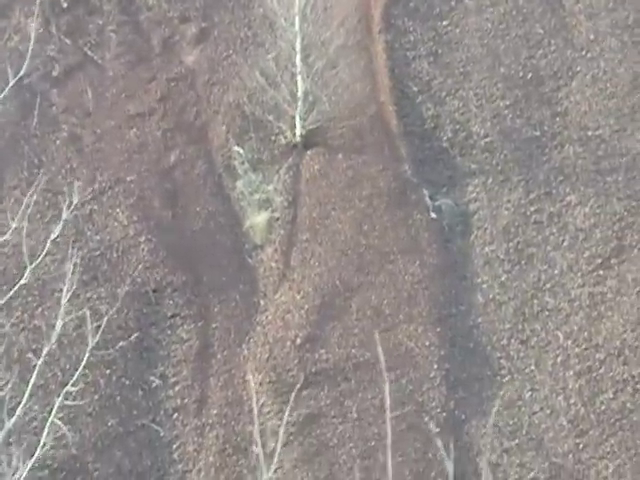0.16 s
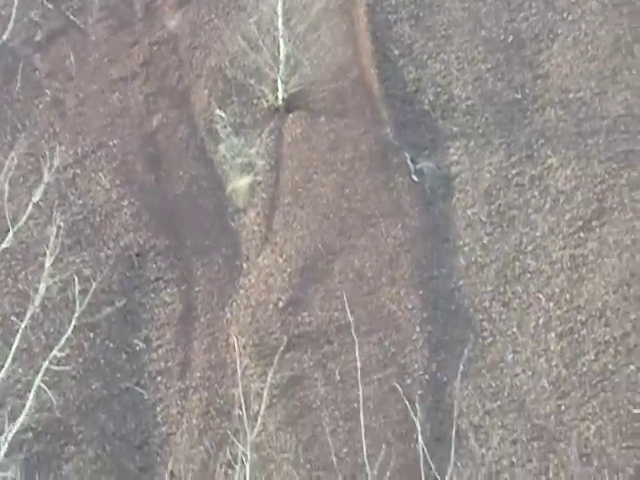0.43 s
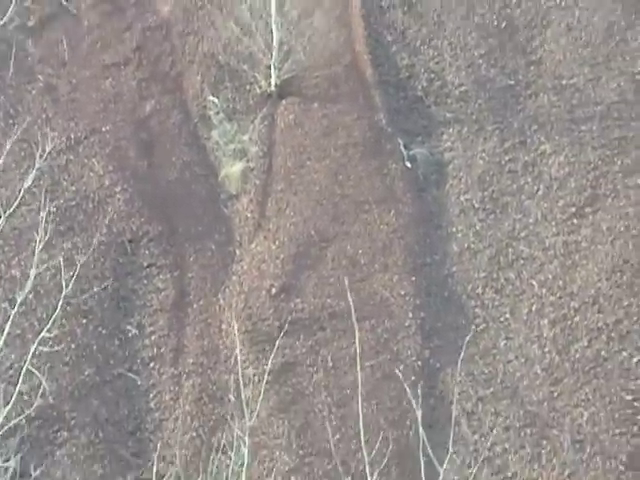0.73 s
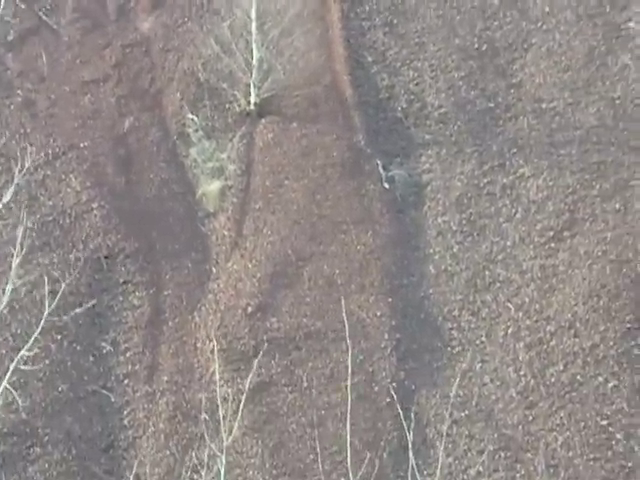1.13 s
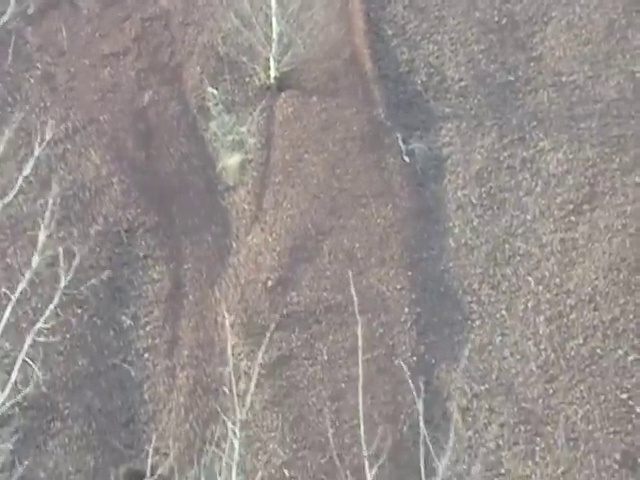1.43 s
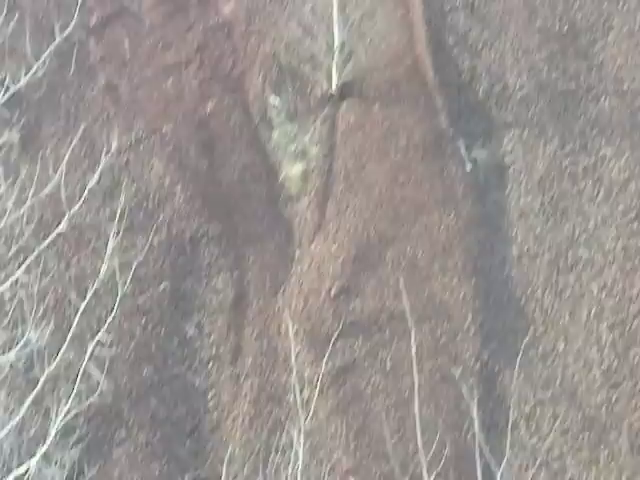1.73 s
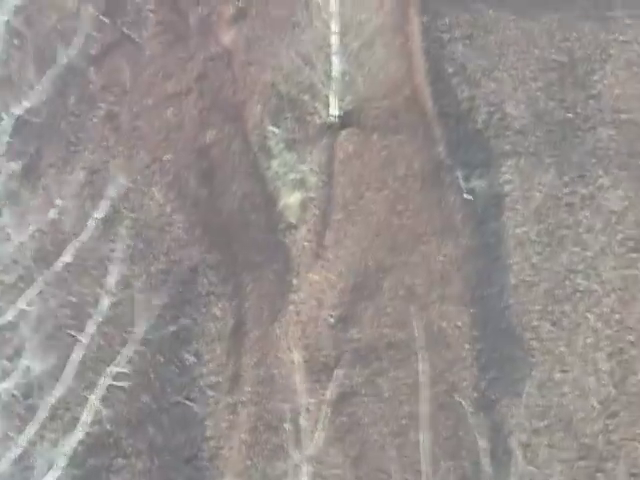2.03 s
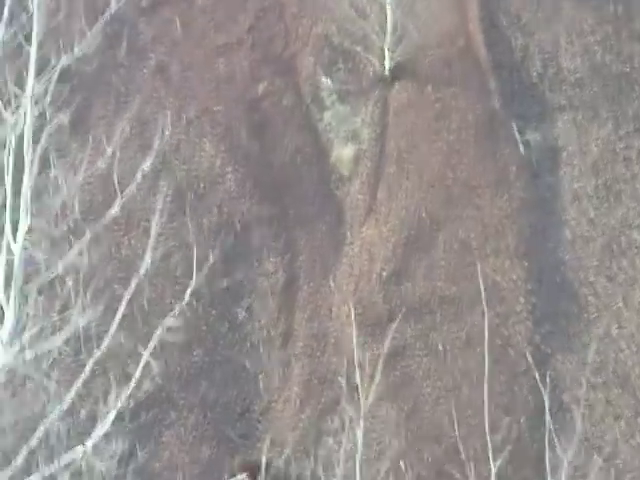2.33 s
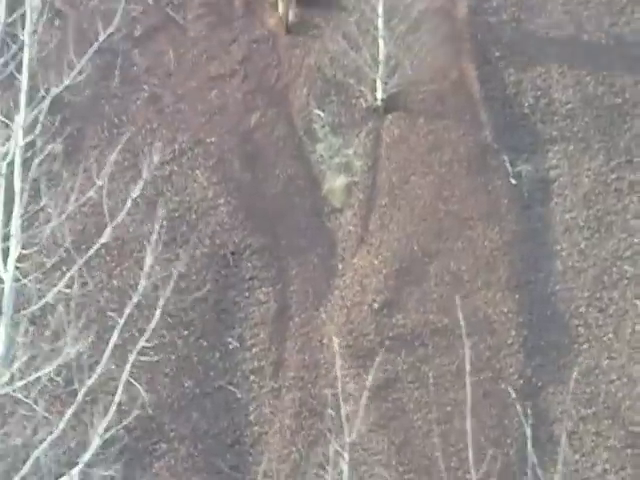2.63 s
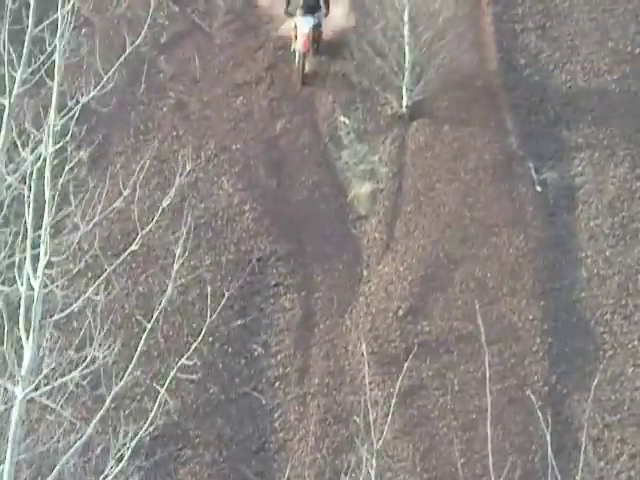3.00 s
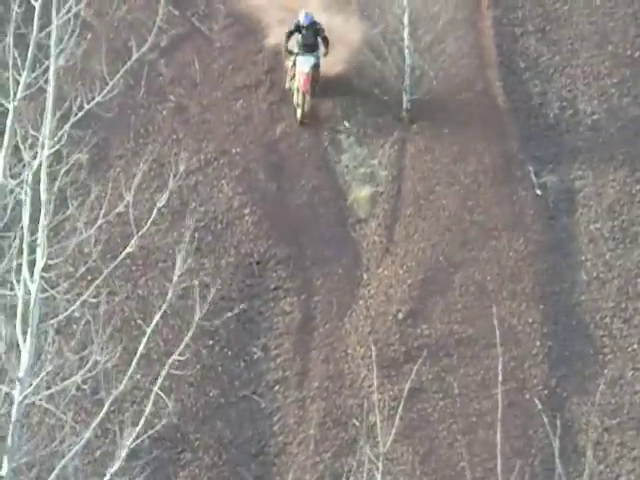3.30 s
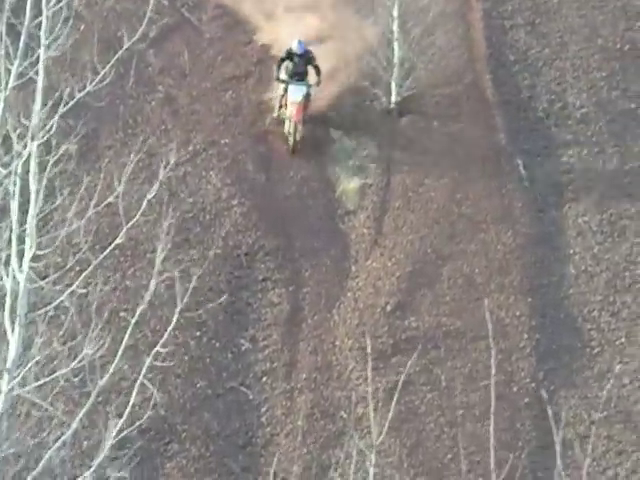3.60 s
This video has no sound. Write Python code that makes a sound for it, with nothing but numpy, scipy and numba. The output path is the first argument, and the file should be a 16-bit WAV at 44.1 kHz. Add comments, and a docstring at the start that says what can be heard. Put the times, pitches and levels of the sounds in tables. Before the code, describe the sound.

A dirt bike putters with dull, irregular pops behind gusty wind thumps, then clears a crest, revs up sharply and drops back to crackling pops; outdoors on a wooded slope, distant narrow-band camera microphone.

```python
"""An uneven putter and popping come down a stony slope through gusty wind, as a dirt bike crosses a crest.
The pops are blurred and dull at first, then sharp; the revs rise briefly and fall, and a thin whine sinks late.
Each pop is a falling snap, silencer rings and a pipe boom, with a gas burst and a scattered noise tail.
Coloured noise makes the wind, the distant rush and the gas rasp; summed sines make the engine's buzz.
A narrow-band camera with a gain control turns everything down on loud blows and recovers slowly."""
import sys
import numpy as np
from scipy import signal
from scipy.fft import rfft, irfft
from scipy.io import wavfile
from scipy.ndimage import uniform_filter1d
from numba import njit

SR = 44100
rng = np.random.default_rng(int(sys.argv[2]) if len(sys.argv) > 2 else 0)


def dump_mix(stems):
    """Bounce the given channels to the path in sys.argv[1] as a 16-bit WAV at rate SR."""
    frames = np.atleast_2d(stems).T  # one column per channel
    limited = np.clip(frames, -1, 1)  # hard clip at full scale
    pcm = np.round(limited * 32767).astype(np.int16)
    wavfile.write(sys.argv[1], SR, pcm)


N = 165375

# Wind blowing on the microphone. Each row: time in seconds, level in dB.
WIND_LEVEL = [(0, -21.5), (.3, -25.5), (.35, -37), (.4, -16.5), (.53, -26.5), (.6, -21.5), (.7, -28),
              (1.0, -29.5), (1.45, -26.5), (1.8, -33), (1.97, -22), (2.15, -27.5), (2.3, -23), (2.72, -50),
              (2.87, -18.5), (3.02, -33.5), (3.3, -28.5), (3.55, -28.5), (3.68, -20.5), (3.75, -26.5)]
# Spectrum of the wind rumble. Each row: frequency in Hz, level in dB.
WIND_COLOUR = [(25, -18.5), (45, -20), (70, -17.5), (130, -2.5), (210, 2.5), (320, 0.5), (550, -5.5),
               (1200, -14.5), (4000, -45.5)]
# Single eddies thumping the diaphragm. Each row: start in seconds, level in dB, swing frequency in Hz.
WIND_THUMPS = [(0.029, -12, 230), (0.063, -2, 450), (0.118, -14, 200), (0.177, -1, 210), (0.26, -0.5, 220),
               (0.292, -8.5, 210), (.388, -5, 380), (.402, 2.5, 400), (.435, -2.5, 430), (.499, 1.5, 190),
               (0.581, -1, 240), (0.594, -12, 260), (0.602, 2, 280), (0.754, -6.5, 240), (0.8126, 4.5, 600),
               (0.8172, 4.5, 400), (.832, 2.5, 330), (0.854, -6.5, 330), (0.963, -9.5, 170),
               (1.001, -2.5, 260), (1.009, -7, 300), (1.039, 0.5, 450), (1.099, -6.5, 170),
               (1.207, -17, 180), (1.221, -1, 210), (1.274, -13, 180), (1.34, -12, 190), (1.388, 0, 230),
               (1.519, -9, 170), (1.584, -10, 280), (1.593, 0.5, 380), (1.725, -6, 170), (1.77, -8, 220),
               (1.82, -10, 230), (1.841, -4.5, 220), (1.964, -8, 190), (2, -26, 200), (2.112, -9, 160),
               (3.153, -3.5, 190)]
# Distant rush from the wooded slope. Each row: time in seconds, level in dB.
RUSH_LEVEL = [(0, -29.5), (.35, -17.5), (.55, -27), (.68, -17.5), (.79, -20), (.87, -26.5), (1.0, -21.5),
              (1.2, -31), (1.26, -38), (1.4, -28), (1.55, -24.5), (1.78, -28.5), (2.0, -28), (2.3, -15),
              (2.9, -31.5), (3.75, -24)]
# Spectrum of the rush and of the scattered pop tails. Each row: frequency in Hz, level in dB.
SLOPE_COLOUR = [(100, -3.5), (250, -29.5), (360, 7), (480, -7.5), (780, -4), (1150, 2), (1250, -1),
                (1340, 6), (1420, -2.5), (1700, -4.5), (1810, 0.5), (1920, -12), (2050, -3.5), (2500, -5.5),
                (2850, -5.5), (3080, -4), (3300, -13.5), (3800, -13), (4400, -19)]
# Engine speed. Each row: time in seconds, firings per second.
FIRING_RATE = [(0, 41.1), (1.8, 50.2), (2.1, 43), (2.18, 60), (2.27, 74.5), (2.37, 75), (2.46, 80),
               (2.53, 82), (2.65, 83.5), (2.73, 67.8), (2.78, 70), (2.86, 61), (3.0, 54.7), (3.15, 48.8),
               (3.4, 41), (3.75, 47.8)]
# Loud exhaust pops. Each row: start in seconds, level in dB, extra pipe boom in dB.
EXHAUST_POPS = [(.298, -15.5, 14.5), (.431, -2, 3), (.479, -8.5, -17.5), (.656, -7.5, 2),
                (.742, -11.5, -15), (.812, -9.5, 8), (.899, -9.5, 6.5), (.923, -9, -15), (.953, -7, -19),
                (1.1, -10, -16), (1.146, -5.5, 3), (1.206, -12, -2.5), (1.309, -15.5, -6.5),
                (1.354, -5.5, -4), (1.445, -10, -4), (1.572, -6.5, 4), (1.634, -11.5, -11),
                (1.699, -7, -22), (1.734, -11, 4.5), (1.841, -12, 5), (1.954, -12, 1), (1.963, -10.5, 2),
                (2.0, -9.5, 5.5), (2.023, -6, 2.5), (2.044, -7.5, 2), (2.155, -12.5, 6), (2.172, 1, 4),
                (2.189, 1.5, -4), (2.221, -1, 4), (2.236, -1, -4), (2.264, 3, 0), (2.277, 4, -6),
                (2.358, 2.5, 2), (2.412, 1.5, -6.5), (2.425, 4, -0.5), (2.463, 3.5, -8), (2.475, 8, -12),
                (2.524, 7, -8), (2.536, -3, -9.5), (2.608, 4, -6.5), (2.62, 1, -6), (2.762, -10, -6),
                (2.776, 4.5, -7.5), (2.92, 0, -2.5), (2.992, -1, -1), (3.011, -3, 0.5), (3.061, -5, -2),
                (3.104, 5, -3), (3.126, -5.5, 4), (3.204, 4, -1.5), (3.288, 0, 3.5), (3.332, -2.5, 1),
                (3.375, -4.5, 3), (3.4, -9.5, 6), (3.419, -1, 0.5), (3.442, -12, 7), (3.484, 0, -1),
                (3.525, -4, 2.5), (3.546, -5.5, 4), (3.588, 2.5, 2), (3.647, 3, 1), (3.666, -1, -1),
                (3.705, -7, 5.5), (3.725, -9, 5.5)]
# Ringing modes of the silencer. Each row: frequency in Hz, level in dB, 60 dB decay time in seconds.
SILENCER_MODES = [(408, -16.5, 0.036), (596, -22, 0.024), (940, -14, 0.027), (1120, -25.5, 0.019),
                  (1330, -24.5, 0.014), (1670, -22, 0.037), (1810, -19.5, 0.048), (2090, -22, 0.046),
                  (2370, -16.5, 0.048), (3020, -16.5, 0.07)]
# Pop sound scattered by the slope and trees. Each row: time in seconds, level in dB.
SCATTER_LEVEL = [(0, -4.5), (1.8, -9), (2.2, -12.5), (3.75, -22)]
# The running engine ahead of the outlet's bass cut.
# Each row: time in seconds, gas rasp level in dB, buzzing note level in dB.
ENGINE_LEVELS = [(0, -40.5, -47), (1.9, -36.5, -44.5), (2.15, -30.5, -23), (2.35, -23.5, -15.5),
                 (2.5, -12, -16.5), (2.64, -25, -14.5), (2.68, -14, -11), (2.76, -21, -13),
                 (2.81, -16, -27), (2.88, -17.5, -22.5), (2.96, -25.5, -30.5), (3.08, -17, -22),
                 (3.16, -22.5, -24), (3.27, -18.5, -24), (3.36, -22, -29), (3.75, -21, -28)]
# Spectrum of the gas noise in rasp and pops. Each row: frequency in Hz, level in dB.
GAS_COLOUR = [(100, -38.5), (250, -15), (375, 3.5), (460, 4.5), (620, -5), (890, 0.5), (945, 9.5),
              (1000, -1), (1065, 11), (1150, -7.5), (1450, -1), (1650, -6.5), (1930, -11), (2150, 1),
              (2550, 2), (2920, -6), (3030, 1), (3300, -4.5), (3700, -3.5), (4400, -24)]
# Strength of the note's harmonics by pitch. Each row: frequency in Hz, level in dB.
NOTE_COLOUR = [(80, -41), (240, -12), (390, 3), (500, -6.5), (620, 4.5), (750, -19), (910, -3), (1350, 2),
               (1700, -2.5), (2500, -8.5), (3200, -8), (4200, -12)]
# Thin whine, probably gears and chain, as the bike slows. Each row: time in seconds, pitch in Hz, level in dB.
WHINE_TRACK = [(2.6, 3137, -58), (2.73, 3070, -27), (2.82, 2750, -41), (2.95, 2400, -35.5),
               (3.08, 2278, -26), (3.22, 2073, -24), (3.58, 2044, -31.5), (3.75, 2086, -31)]

# Wind and rush
WIND_FLUTTER_DB, RUSH_FLUTTER_DB = 3.0, 4
THUMP_CYCLES = 0.21  # a thump dies away by 1/e in this share of a cycle

# Exhaust pulses
SNAP_HZ, SNAP_DB, SNAP_T60_S = 1640, 3, 0.0092
SNAP_GLIDE, SNAP_JITTER = 0.12, .015  # shares: starting sharpness, random pitch spread
BOOM_HZ, BOOM_DB, BOOM_T60_S, BOOM_RISE_S = 368.3, -2, 0.047, 0.0013
RISE_S = 0.00058  # build-up of the snap and silencer rings
MODE_JITTER = .008  # random detuning of silencer and boom, as a share
CREST_S, SHADE_DB = 1.8, -8.5  # the snap is shaded until the bike clears the crest
PUTTER_DB, PUTTER_SPREAD_DB = -22.5, 3.5  # weak firings between the pops
CRACK_DB, CRACK_T60_S = -7, .016  # gas burst with each firing
SCATTER_LEAD_S, SCATTER_T60_S = 0.004, 0.036  # the tail swells into the pop, then decays

# Running engine
SPEED_JITTER, NOTE_FLUTTER_DB, GRIT_DB = .006, 1.5, 3.0  # the first is a share of the firing rate
THIRD_ORDER_DB = 6  # lift of every third harmonic
PIPE_ECHO = 0.099  # share of the gas noise that returns inverted from the open end
MUZZLE_CUT_HZ = 278

# Camera
LOW_CUT_HZ, BAND_HZ, TOP_HZ = 108, 4076, 15900
THRESHOLD_DB, RATIO, ATTACK_S, RELEASE_S = -14, 4.13, 0.0026, 0.085
CLIP_LEVEL = .7


def undb(db):
    """Decibels to gain."""
    return 10 ** (np.asarray(db) / 20)


def curve(rows, t, axis=1):
    """One column of a table over time or frequency, joined by straight lines."""
    rows = np.array(rows)
    return np.interp(t, rows[:, 0], rows[:, axis])


def walk(rate):
    """Smooth random wandering with a spread near 1, taking rate new values per second."""
    hold = int(SR / rate)
    steps = np.repeat(rng.standard_normal(N // hold + 1), hold)
    smooth = uniform_filter1d(uniform_filter1d(steps, hold), hold)
    return 1.3 * smooth[:N]


def colour(x, points):
    """Give x a spectrum of (Hz, dB) points, joined on a log-frequency axis, and an rms of 1."""
    hz, db = np.array(points).T
    log_hz = np.log(np.fft.rfftfreq(N, 1 / SR) + 1)  # the 1 avoids log(0)
    gain = undb(np.interp(log_hz, np.log(hz), db))
    y = irfft(rfft(x) * gain, N)
    return y / y.std()


def fade(t, t60):
    """Exponential decay by 60 dB in t60 seconds."""
    return np.exp(-np.log(1000) * t / t60)


def add(out, start, x):
    """Mix x into out at a time in seconds, trimming what falls outside."""
    i = int(start * SR)
    a, b = max(i, 0), min(i + len(x), N)
    if b > a:
        out[a:b] += x[a - i:b - i]


def wind(t):
    """Fluttering rumble, and single eddies that pull and push the diaphragm once."""
    flutter_db = WIND_FLUTTER_DB * walk(60)
    out = colour(rng.standard_normal(N), WIND_COLOUR) * undb(curve(WIND_LEVEL, t) + flutter_db)
    for start, db, hz in WIND_THUMPS:
        cycles = t[:SR // 20] * hz - 2  # zero at the turn from pull to push
        swing = np.sqrt(2) * np.sin(2 * np.pi * cycles)
        thump = undb(db) * np.exp(-np.abs(cycles) / THUMP_CYCLES) * swing
        add(out, start - 1.513 / hz, thump)  # puts the main pull at the listed start
    return out


def rush(t):
    """A fluttering, distant rush: noise with a few steady resonances."""
    flutter_db = RUSH_FLUTTER_DB * walk(70)
    return colour(rng.standard_normal(N), SLOPE_COLOUR) * undb(curve(RUSH_LEVEL, t) + flutter_db)


def ring(t, hz, t60, phase=0):
    """A decaying sine at a fixed or gliding frequency, like a struck resonance."""
    turn = 2 * np.pi * np.cumsum(hz * np.ones(len(t))) / SR
    return np.sin(turn + phase) * fade(t, t60)


def firing(start, boom_db, jitter):
    """One exhaust pulse: a falling snap, the silencer's ring and the slower boom of the pipe."""
    t = np.arange(SR // 10) / SR
    detune = 1 + MODE_JITTER * jitter
    snap_hz = SNAP_HZ * (1 + SNAP_JITTER * jitter[-1]) * (1 + SNAP_GLIDE * fade(t, SNAP_T60_S))
    snap_db = SNAP_DB + SHADE_DB * (start < CREST_S)
    snap = undb(snap_db) * ring(t, snap_hz, SNAP_T60_S)
    silencer = 0
    for k, (hz, db, t60) in enumerate(SILENCER_MODES):
        silencer = silencer + undb(db) * ring(t, hz * detune[k], t60, np.pi * jitter[k])
    boom = undb(BOOM_DB + boom_db) * ring(t, BOOM_HZ * detune[-2], BOOM_T60_S)
    boom = boom * (1 - np.exp(-t / BOOM_RISE_S))
    return (snap + silencer) * (1 - np.exp(-t / RISE_S)) - boom


def exhaust(t):
    """Weak uneven firings and loud pops, each with a burst of gas and a scattered tail."""
    gas = colour(rng.standard_normal(N), GAS_COLOUR)
    scattered = colour(rng.standard_normal(N), SLOPE_COLOUR)
    chance = rng.standard_normal((400, 12))  # one row per firing: silencer modes, boom, snap

    # a weak firing each time the engine completes another firing interval
    firings_done = np.floor(np.cumsum(curve(FIRING_RATE, t)) / SR)
    beats = t[1:][np.diff(firings_done) > 0]
    weak = [(s, PUTTER_DB + PUTTER_SPREAD_DB * c, 0) for s, c in zip(beats, chance[::-1, -3])]

    pulses, burst, tail = np.zeros((3, N))
    age = t[:SR // 10]
    spread = np.concatenate([np.exp(-age[::-1] / SCATTER_LEAD_S), fade(age, SCATTER_T60_S)])
    for (start, db, boom_db), jitter in zip(EXHAUST_POPS + weak, chance):
        add(pulses, start, undb(db) * firing(start, boom_db, jitter))
        add(burst, start, undb(db) * fade(age, CRACK_T60_S))
        add(tail, start - len(age) / SR, undb(db) * spread)
    crack = undb(CRACK_DB) * burst * gas
    blur = undb(curve(SCATTER_LEVEL, t)) * tail * scattered
    return pulses + crack + blur


def engine(t):
    """A buzz on the multiples of the firing rate, and gritty gas noise ringing in the pipe."""
    rate = curve(FIRING_RATE, t) * (1 + SPEED_JITTER * walk(50))
    turn = 2 * np.pi * np.cumsum(rate) / SR
    phases = rng.uniform(0, 2 * np.pi, size=60)
    accents = np.resize([0, 1, 0], len(phases))  # harmonics 2, 5, 8 and so on are stronger
    note = np.zeros(N)
    for k, (accent, phase) in enumerate(zip(accents, phases), 1):
        harmonic_db = curve(NOTE_COLOUR, k * rate) + THIRD_ORDER_DB * accent
        note += undb(harmonic_db) * np.sin(k * turn + phase)
    note_db = curve(ENGINE_LEVELS, t, axis=2) + NOTE_FLUTTER_DB * walk(80)
    note = note / note.std() * undb(note_db)

    grit = rng.standard_normal(N) * undb(GRIT_DB * walk(400))
    rasp = colour(grit, GAS_COLOUR)
    # the echo returns after half a period of the pipe boom
    rasp = rasp - PIPE_ECHO * np.interp(t - .5 / BOOM_HZ, t, rasp)
    return note + rasp * undb(curve(ENGINE_LEVELS, t, axis=1))


def outlet(x):
    """The small exhaust outlet radiates little bass."""
    return signal.sosfilt(signal.butter(N=3, Wn=MUZZLE_CUT_HZ, btype="high", fs=SR, output="sos"), x)


def whine(t):
    """A narrow tone whose level and phase waver at random around a sinking pitch."""
    waver = walk(140) + 1j * walk(140)
    tone = waver * np.exp(2j * np.pi * np.cumsum(curve(WHINE_TRACK, t)) / SR)
    return tone.real * undb(curve(WHINE_TRACK, t, axis=2))


def scene():
    """Wind, slope and bike at one microphone."""
    t = np.arange(N) / SR
    return (wind(t) + rush(t) + exhaust(t) + outlet(engine(t)) + whine(t))[None]


@njit
def follow(x, attack, release):
    """Level detector that rises quickly and falls slowly."""
    out, level = np.empty(len(x)), 0.
    for i in range(len(x)):
        size = abs(x[i])
        level += (size - level) * (attack if size > level else release)
        out[i] = level
    return out


def record(dry):
    """The camera cuts the bass, ducks on loud blows, keeps a narrow band and clips the tallest peaks."""
    x = signal.sosfilt(signal.butter(N=2, Wn=LOW_CUT_HZ, btype="high", fs=SR, output="sos"), dry[0])
    level = follow(x, 1 / (ATTACK_S * SR), 1 / (RELEASE_S * SR))
    overshoot = np.maximum(level / undb(THRESHOLD_DB), 1)
    x = x * overshoot ** (1 / RATIO - 1)
    x = np.convolve(x, signal.firwin(161, BAND_HZ, window=("kaiser", 8), fs=SR), "same")
    x = np.clip(x, -CLIP_LEVEL, CLIP_LEVEL)
    # a steep low-pass trims the top of the clipping's overtones
    return signal.sosfilt(signal.ellip(8, .2, 70, TOP_HZ, fs=SR, output="sos"), x)[None]


dry = scene()
out = record(dry)
dump_mix(out)
```